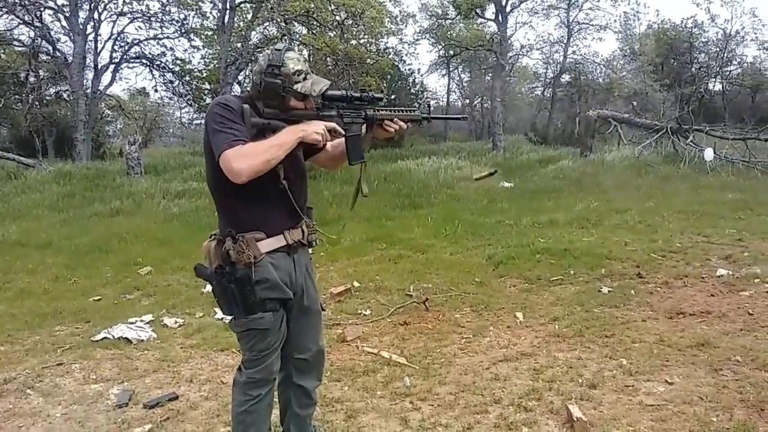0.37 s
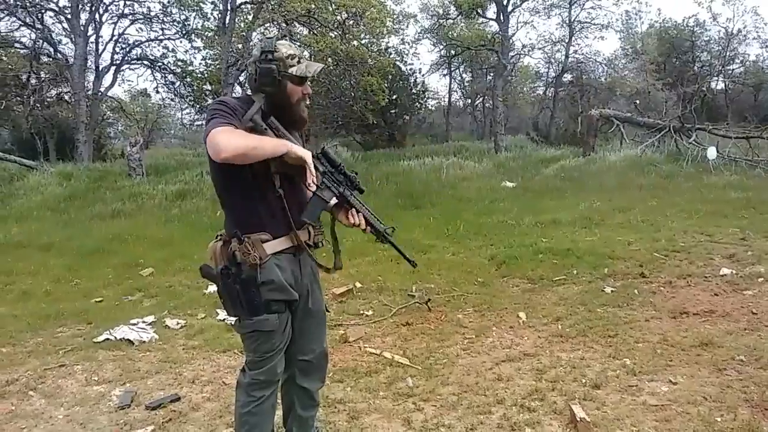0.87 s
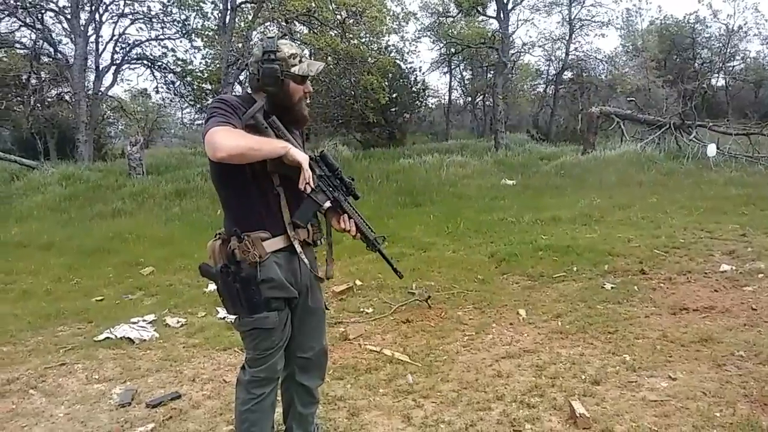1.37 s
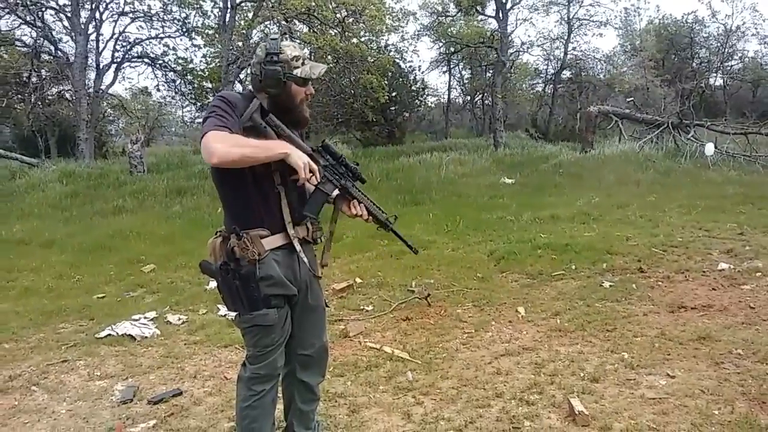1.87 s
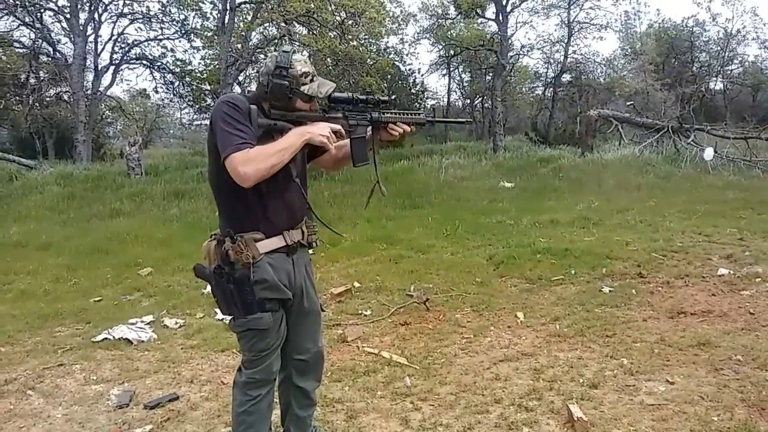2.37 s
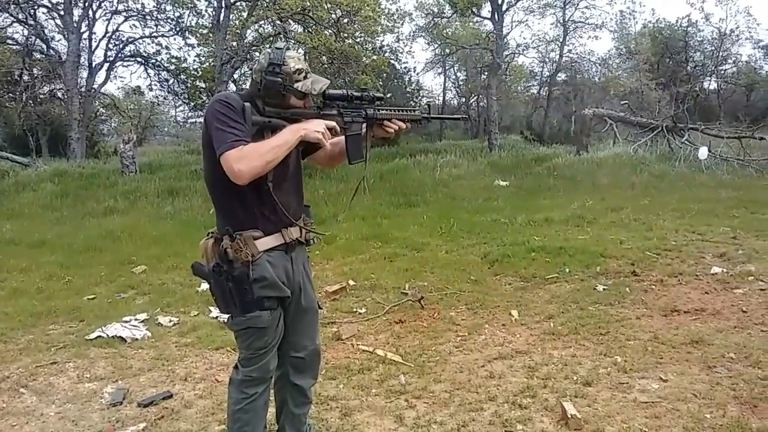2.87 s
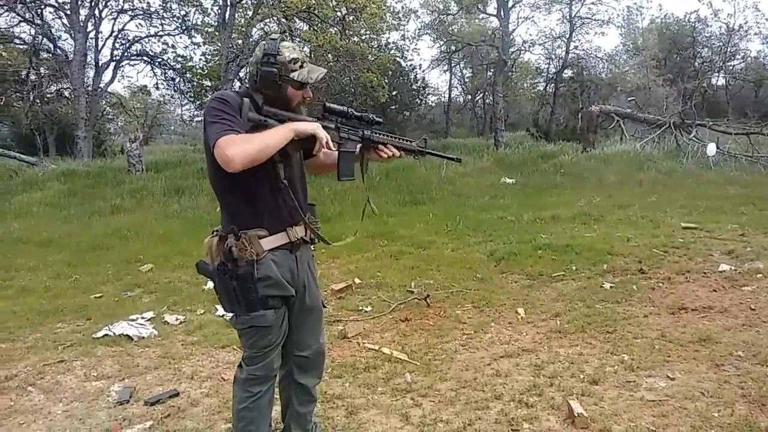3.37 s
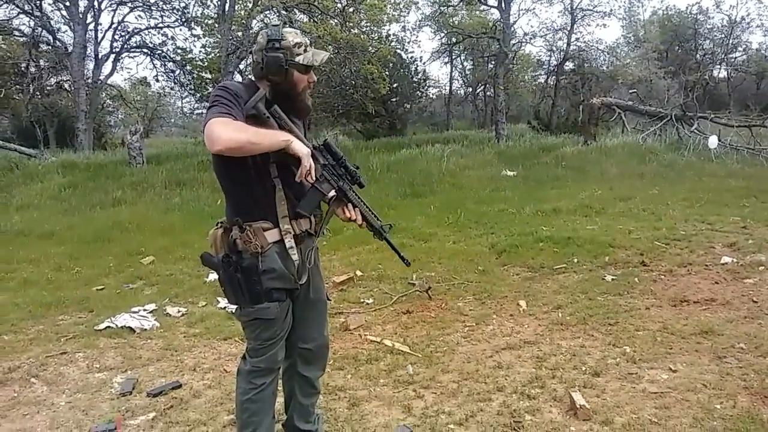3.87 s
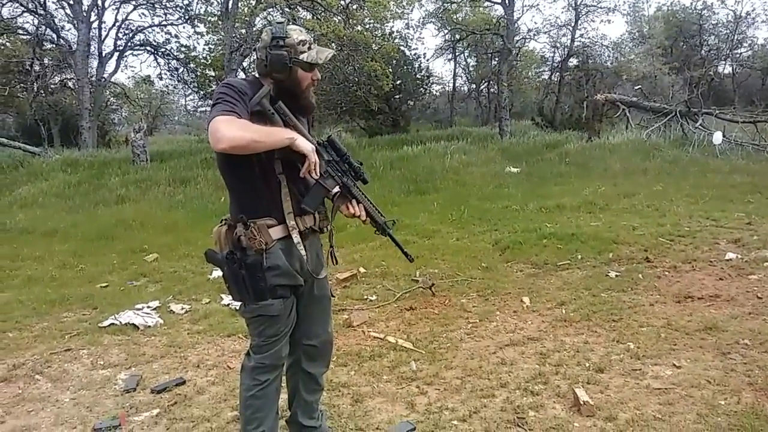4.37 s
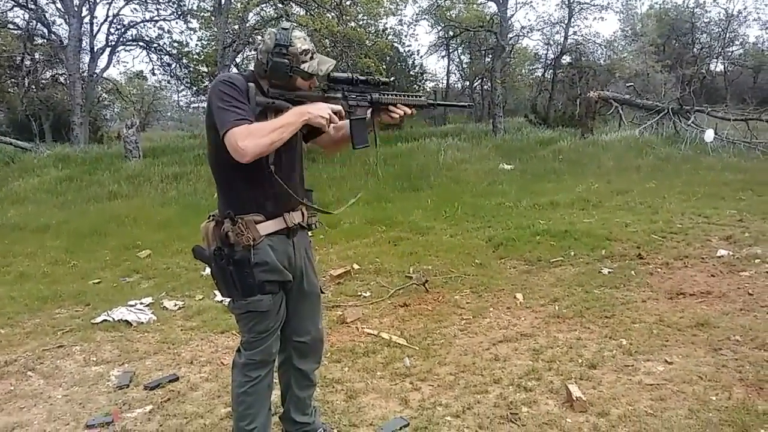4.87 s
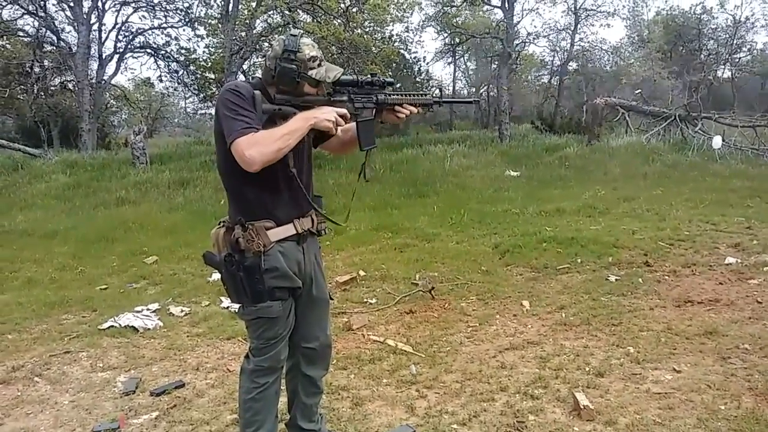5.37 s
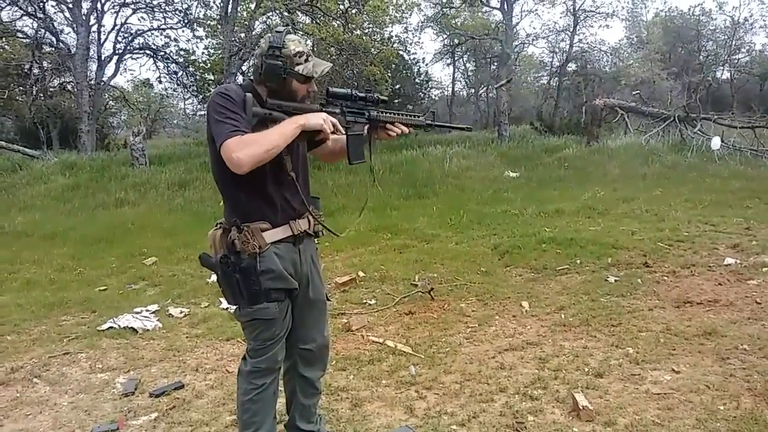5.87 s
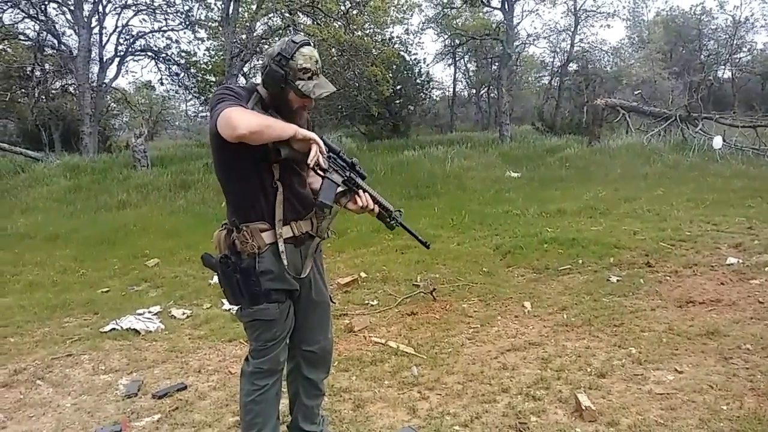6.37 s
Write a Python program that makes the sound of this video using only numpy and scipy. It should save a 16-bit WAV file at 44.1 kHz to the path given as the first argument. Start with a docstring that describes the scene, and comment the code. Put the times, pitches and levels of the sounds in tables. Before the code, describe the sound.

Outdoors in a tree-lined clearing, the roar of a rifle shot just fired is already ringing at 0 s, and a second shot hits at 0.1 s. The blasts are close, sharp and boomy, flattened by an overloaded camera microphone, with the bolt slamming home inside the roar. Uneven echoes return from the trees, losing treble as they fade. A crisp lever click comes near 0.9 s, with low wind puffs and a dull bump until about 1.8 s; another click at 2.0 s. A second pair fires at 2.8 and 3.0 s, followed by bright clicks at 3.6 and 3.8 s. Faint dull taps and knocks lead to a rattling click at 4.8 s. The last pair fires at 5.4 and 5.6 s; its tail fades under soft gear taps from 6.15 s to the end near 6.7 s. Leaves, a faint cricket, hiss and thin whine persist underneath.

```python
"""A rifle fires three quick pairs of shots in a clearing; the first blast falls just before the start.
After each pair the woods answer with a long overloaded roar: noise under summed echo decays.
Then the safety lever and sling click, with faint short rustles (noise bursts through resonances), and wind
puffs and two faint dull knocks sound (short low swings). All along, leaves and grass rustle and a far cricket
chirps (coloured noise), and the camera's electronics hiss and whine faintly (noise and a gated tone)."""
import sys
import numpy as np
from scipy import signal
from scipy.fft import rfft, irfft, next_fast_len
from scipy.io import wavfile
from scipy.ndimage import uniform_filter1d, map_coordinates

SR = 44100
rng = np.random.default_rng(int(sys.argv[2]) if len(sys.argv) > 2 else 0)


def rack_gain(trim_db):
    """Turn a fader trim in dB into the linear factor to multiply a signal by."""
    fader = np.asarray(trim_db, float)
    return 10 ** (fader / 20)


def output_pcm(signal):
    """Save a mono or channel-first signal as 16-bit PCM at the path in sys.argv[1].

    Samples are clipped to [-1, 1] before scaling.
    """
    pcm = np.clip(np.atleast_2d(signal).T, -1, 1) * 32767
    wavfile.write(sys.argv[1], SR, np.round(pcm).astype(np.int16))


N = 297234

# stands of trees that answer together: after_blast_s, boom_lift_db, crack_lift_db, spread_s
TREE_STANDS = [(.072, 8, 3, 0.0077), (.097, 7, 1, 0.011), (.16, -1, 3, 0.15), (.27, 6, 4.5, 0.053),
               (.44, 3.5, 1.5, 0.096), (.56, 5, 0.5, 0.044)]


def unit(x):
    """Scales to rms 1."""
    return x / np.sqrt(np.mean(x ** 2) + 1e-20)


def along(points, hz):
    """Reads (Hz, value) points on a log frequency axis."""
    point_hz, value = np.transpose(points)
    return np.interp(np.log(hz + 1), np.log(point_hz + 1), value)


def curve(rows):
    """Interpolates (s, value) rows to one value per sample."""
    return np.interp(np.arange(N) / SR, *np.transpose(rows))


def wobble(knots_per_s, size=N):
    """Smooth random curve through normally distributed knots."""
    knots = rng.standard_normal(int(size * knots_per_s / SR) + 4)
    return map_coordinates(knots, [np.arange(size) * knots_per_s / SR])


def filtered(x, response):
    """Multiplies the spectrum of x by a complex response of frequency."""
    padded = next_fast_len(len(x) + 8192)
    hz = np.fft.rfftfreq(padded, 1 / SR)
    return irfft(rfft(x, padded) * response(hz), padded)[:len(x)]


def noise(spectrum, size=N):
    """Noise of rms 1, coloured by (Hz, relative dB) points."""
    white = rng.standard_normal(size)
    return unit(filtered(white, lambda hz: rack_gain(along(spectrum, hz))))


def add(track, start_s, sound):
    """Mixes sound into track in place, trimmed at both ends of the track."""
    i = round(start_s * SR)
    sound = sound[max(-i, 0):][:len(track) - max(i, 0)]
    track[max(i, 0):][:len(sound)] += sound


def electronics():
    """Steady hiss, and a thin unsteady tone on for about two thirds of every sixtieth of a second."""
    t = np.arange(N) / SR
    hiss = rack_gain(-64) * noise([(1000, -21), (5000, -0.5), (9000, -3), (15000, -0.5)])
    is_on = (60 * t - 0.35) % 1 < 0.69
    gate = uniform_filter1d(is_on * 1.0, size=40)
    whine_hz = 7650 + 45 * wobble(200)
    return hiss + rack_gain(-61.5) * gate * np.sin(2 * np.pi * np.cumsum(whine_hz) / SR)


def rustling():
    """Rustle of leaves and grass, with a brighter, wider-swinging part close by as the shooter moves."""
    # rustle: time_s, rustle_db
    rustle = [(0, -54), (2.15, -52), (2.5, -57), (4.2, -53.5), (4.7, -51), (5.3, -56), (6.3, -52.5),
              (6.5, -51.5), (6.74, -48.5)]
    # rustle colour: freq_hz, relative_db
    rustle_colour = [(100, -31.5), (200, -9), (320, -7.5), (700, -3), (1100, -8), (1600, -11.5),
                     (2700, -19.5), (4500, -23), (7500, -30), (10000, -49.5)]
    # close rustle colour: freq_hz, relative_db
    near_colour = [(700, -29), (1500, 0), (2700, -10.5), (4000, -4), (6300, -7.5), (8500, -25)]
    near_mean_db, near_swing_ratio = -67, 1.4
    rustle_db = curve(rustle)
    far_db = rustle_db - 0.5 * wobble(15) + 1.4 * wobble(55)
    near_db = near_mean_db + near_swing_ratio * (rustle_db - rustle_db.mean())
    near_db = near_db + 1.1 * wobble(30) + 1.3 * wobble(150)
    return rack_gain(far_db) * noise(rustle_colour) + rack_gain(near_db) * noise(near_colour)


def cricket():
    """Far cricket: a narrow noise band gated about four times a second."""
    t = np.arange(N) / SR
    period_s, peak_s = 0.26, 0.145
    chirps = np.clip(np.cos(2 * np.pi * (t - peak_s) / period_s) + 0.2, 0, 1)
    band = noise([(3700, -54.5), (4250, -1.5), (4550, 6.5), (5200, -53)])
    return rack_gain(-67 + 2.5 * wobble(3.4)) * chirps * band


def buffeting():
    """Wind on the microphone: low noise whose level wobbles into lumps."""
    # wind: time_s, buffet_db
    wind_level = [(0, -48.5), (.7, -41.5), (1.05, -49), (1.2, -61), (1.45, -43), (1.75, -54), (2.03, -68.5),
                  (2.1, -51), (2.4, -59.5), (2.75, -48.5), (3.9, -58.5), (4.8, -67.5), (5.1, -62),
                  (6.4, -54), (6.74, -65)]
    # buffet colour: freq_hz, relative_db
    buffet_colour = [(20, -43.5), (50, -9.5), (110, 0), (180, -8), (300, -11.5), (500, -45.5)]
    lumpy = rack_gain(2.7 * wobble(20)) * noise(buffet_colour)
    return rack_gain(curve(wind_level)) * unit(lumpy)


def puffs_and_knocks():
    """Wind puffs and two faint dull knocks: a few uneven low swings, faster when strong or short."""
    # puffs, and in the last two rows the dull knocks: centre_s, level_db, length_s
    swing_rows = [(.83, -17, 0.01), (.855, -21, 0.0041), (.894, -17, 0.008), (.91, -14, 0.0021),
                  (.925, -28, 0.013), (.972, -26, .009), (.983, -22, .003), (1.01, -26, 0.013),
                  (1.142, -41.5, .01), (1.271, -29, 0.0096), (1.288, -10.5, 0.0034), (1.312, -33, 0.014),
                  (1.394, -37.5, 0.011), (1.426, -25.5, .005), (1.441, -23, .0049), (1.479, -17, 0.0024),
                  (1.5, -26, .01), (1.545, -18.5, 0.002), (1.6, -26.5, 0.006), (1.625, -32, 0.0051),
                  (1.654, -34, 0.0068), (1.687, -41, 0.0046), (1.749, -49, 0.011), (1.784, -38, 0.0056),
                  (2.29, -44.5, 0.0085), (2.535, -41.5, 0.0074), (3.798, -37.5, .01), (4.368, -38, .0018),
                  (4.603, -38, 0.0014)]
    base_hz, hz_per_db, hz_per_s = 300, 4.5, 1800
    out = np.zeros(N)
    t = np.arange(-2205, 2205) / SR
    for centre_s, level_db, length_s in swing_rows:
        hz = base_hz + hz_per_db * level_db - hz_per_s * length_s
        phase = 2 * np.pi * hz * t + 1.23 + 1.3 * wobble(90, size=len(t))
        swing = np.cos(phase) + 0.21 * np.cos(2 * phase + 0.88)
        add(out, centre_s + t[0], rack_gain(level_db) * np.exp(-(t / length_s) ** 2) * swing)
    return out


def click(level_db, low_db, high_db, body_db, rattle_s):
    """A first blow and a fading rattle ring a set of resonances, then die into a short echo."""
    # resonances of the small steel parts: centre_hz, width_hz
    parts = [(6900, 860), (3800, 1300), (13010, 4300), (1200, 1200)]
    t = np.arange(SR // 10) / SR
    after_s = np.maximum(t - rattle_s, 0)
    rattle = rack_gain(-4 * np.minimum(t / (rattle_s + 0.0008), 1))
    decay = rack_gain(-60 * after_s / 0.0053)
    echo = rack_gain(-10.5 - 60 * after_s / 0.055)
    onset = 1 - np.exp(-t / (0.0001 + 9 * rattle_s ** 2))  # long rubs start softly
    shape = rattle * (decay + echo) * onset
    burst = shape * rack_gain(1.4 * wobble(970, size=len(t))) * rng.standard_normal(len(t))
    burst[4] += 4 * np.exp(-rattle_s / 0.006)  # first blow

    def ring(hz):
        """Sums the resonances with alternating polarity."""
        total = 0
        for k, ((centre_hz, width_hz), db) in enumerate(zip(parts, (0, low_db, high_db, body_db))):
            damping = 1j * hz * width_hz
            total = total + (-1) ** k * rack_gain(db) * damping / (centre_hz ** 2 - hz ** 2 + damping)
        return total

    sound = filtered(burst, ring)
    near_peak = np.percentile(np.abs(sound[t < rattle_s + 0.002]), 97)
    return rack_gain(level_db) * sound / near_peak


def clicks_and_rustles():
    """Lever and buckle clicks, and two faint short rustles; the lowest resonance grows with the rattle time."""
    # clicks, and rustles at 3.768 and 6.374 s: time_s, level_db, heavy_parts_db, thin_edge_db, rattle_s
    click_rows = [(.852, -32, -11.5, -19.5, 0.0018), (0.9242, -6.5, -14, -9.5, 0.00078),
                  (0.9999, -19.5, 5, -12.5, .003), (2.015, -13, -7.5, -10.5, .0073),
                  (2.157, -47, -9.5, -26, 0.0077), (2.6624, -47.5, -4, -17, .003),
                  (3.5831, -22.5, -4.5, -5, .001), (3.586, -4.5, -22.5, -10.5, .002),
                  (3.7471, -26.5, 12, -23.5, 0.002), (3.768, -46, -8, -7, .018),
                  (3.792, -13, -0.5, -26, 0.0023), (3.8386, -35, -13.5, -14, .0024),
                  (4.8028, -12.5, -8.5, -14.5, .01), (4.935, -43.5, -12, -21, 0.0034),
                  (5.183, -45, 3.5, -20, 0.0032), (6.374, -40, -13.5, -7.5, 0.029)]
    body_under_db, body_db_per_s = 19, 1104.5  # under the heavy parts, less so in long rattles
    out = np.zeros(N)
    for time_s, level_db, heavy_db, edge_db, rattle_s in click_rows:
        body_db = heavy_db - body_under_db + body_db_per_s * rattle_s
        add(out, time_s - 0.0008, click(level_db, heavy_db, edge_db, body_db, max(rattle_s, 0)))
    return out


def thumb_rubs():
    """The thumb slides to the lever: long, soft-starting rattles."""
    # rubs: start_s, level_db
    rubs = [(1.931, -52.5), (4.73, -53.5), (6.15, -50.5)]
    out = np.zeros(N)
    for start_s, level_db in rubs:
        add(out, start_s, click(level_db, -8, -11, -29.5, rattle_s=0.05))
    return out


def gear_taps():
    """Dull taps of sling and pouches: low-heavy clicks, low-passed as by cloth."""
    # taps: time_s, level_db before the cloth
    taps = [(4.097, -44.5), (4.148, -45.5), (1.821, -48.5), (6.155, -23.5), (6.361, -32), (6.454, -38.5),
            (6.62, -34.5), (6.69, -42), (6.728, -39.5)]
    cloth_hz = 4830
    out = np.zeros(N)
    for time_s, level_db in taps:
        bare = click(level_db, 2.5, -22, 13, rattle_s=0.0081)
        add(out, time_s - 0.0008, filtered(bare, lambda hz: 1 / (1 + 1j * hz / cloth_hz) ** 2))
    return out


def trunks(t, fast_db, slow_db):
    """Lumpy echo gain: late echoes come from fewer trunks, so the fast lumps grow."""
    sparser_per_s = 1.5
    growth = 1 + sparser_per_s * np.minimum(t, 0.7)
    fast = fast_db * growth * wobble(220, size=len(t))
    return rack_gain(fast + slow_db * wobble(40, size=len(t)))


def echoes(t, lifts_db, hold_s, burst_db, tree_db, tree_fall_db_per_s, hill_db, hill_fall_db_per_s):
    """Gain after a blast: near burst, trees and far hills add in power."""
    burst_fall_db_per_s = 700
    lift_db = 0
    for db, (after_s, *_, spread_s) in zip(lifts_db, TREE_STANDS):
        lift_db = lift_db + db * np.exp(-((t - after_s) / spread_s) ** 2)
    burst = rack_gain(burst_db - burst_fall_db_per_s * np.maximum(t - hold_s, 0))
    trees = rack_gain(tree_db - tree_fall_db_per_s * t + lift_db)
    hills = rack_gain(hill_db - hill_fall_db_per_s * t)
    return np.sqrt(burst ** 2 + trees ** 2 + hills ** 2)


def air_absorbed(crack):
    """Later echoes travel farther, so air takes their treble."""
    hz, frame_s, bins = signal.stft(crack, SR, nperseg=256)
    loss_db = 70 * np.minimum(frame_s, 0.8) * (hz[:, None] / 12000) ** 1.61
    return signal.istft(bins * rack_gain(-loss_db), SR, nperseg=256)[1][:len(crack)]


def rifle():
    """Hammer click, blast pulse, boom and crack echoing in the woods, then the bolt slamming home."""
    # muzzle blasts: time_s, level_db
    shots = [(-.129, -0.5), (0.1007, 0), (2.8011, 0.5), (3.0314, -1), (5.4059, 0), (5.6349, -0.5)]
    # boom colour: freq_hz, relative_db
    boom_colour = [(20, -42.5), (90, -20.5), (200, -8), (280, -4.5), (400, -7), (540, -3), (720, -1.5),
                   (950, -6.5), (1400, -7), (2000, -10), (2700, -16), (4000, -23.5), (7000, -46),
                   (11000, -91.5)]
    # crack colour: freq_hz, relative_db
    crack_colour = [(800, -42.5), (1800, -9.5), (2600, -12), (3300, -3.5), (4200, -0.5), (5200, -2),
                    (6400, 2), (7400, -5.5), (8600, -12.5), (11000, -15.5), (13500, -15), (16000, -14)]
    out = np.zeros(N)
    t = np.arange(2 * SR) / SR
    _, boom_lifts_db, crack_lifts_db, _ = np.transpose(TREE_STANDS)
    boom_gain = echoes(t, boom_lifts_db, hold_s=0.0322, burst_db=5, tree_db=-4, tree_fall_db_per_s=56.5,
                       hill_db=-57, hill_fall_db_per_s=5)
    crack_gain = echoes(t, crack_lifts_db, hold_s=0.0194, burst_db=12.5, tree_db=-1, tree_fall_db_per_s=51,
                        hill_db=-67.5, hill_fall_db_per_s=8.5)
    # the same trees return the low notes alike every time
    same = trunks(t, 1.8, 1.6) * noise(boom_colour, size=len(t))
    low = noise([(50, -35.5), (110, -11.5), (200, -2.5), (330, -3), (600, -42)], size=len(t))
    # a hillside sends back one deep thump
    thump = rack_gain(-20 - 6.1 * ((t - 0.27) / 0.064) ** 2) * low
    # the pressure wave rocks the diaphragm
    heave = 0.13 * rack_gain(-60 * t / 0.39) * np.sin(2 * np.pi * 32 * t)
    u = t / 0.0015
    pulse = -3 * (1 - u) * np.exp(-u)
    for time_s, level_db in shots:
        crack = trunks(t, 1, 0.62) * crack_gain * air_absorbed(noise(crack_colour, size=len(t)))
        stirred = 0.45 * noise(boom_colour, size=len(t))  # moving air changes part of the boom
        boom = boom_gain * (same + stirred)
        add(out, time_s, rack_gain(level_db) * (boom + crack + heave + thump + pulse))
        add(out, time_s - 0.0068, click(-3.5, 0, -1.5, -14, rattle_s=0.00024))  # hammer falls
        add(out, time_s + 0.064, click(5, -13, -20, -31, rattle_s=0.01))  # bolt slams home
    return out


def scene():
    """Sums all sources into one channel."""
    background = electronics() + rustling() + cricket() + buffeting() + puffs_and_knocks()
    handling = clicks_and_rustles() + thumb_rubs() + gear_taps()
    return (background + handling + rifle())[None]


def low_pass(x):
    """Removes everything above the highest recorded frequency."""
    return signal.sosfilt(signal.butter(12, 15920, fs=SR, output="sos"), x)


def record(dry):
    """The input stage flattens the blasts as it overloads, then blocks the deepest bass."""
    ceiling, bass_cut_hz = 0.78, 25
    bent = dry / (1 + (dry / ceiling) ** 4) ** (1 / 4)
    passed = filtered(bent[0], lambda hz: 1j * hz / (bass_cut_hz + 1j * hz))[None]
    return low_pass(passed)


dry = scene()
out = record(dry)
output_pcm(out)
```